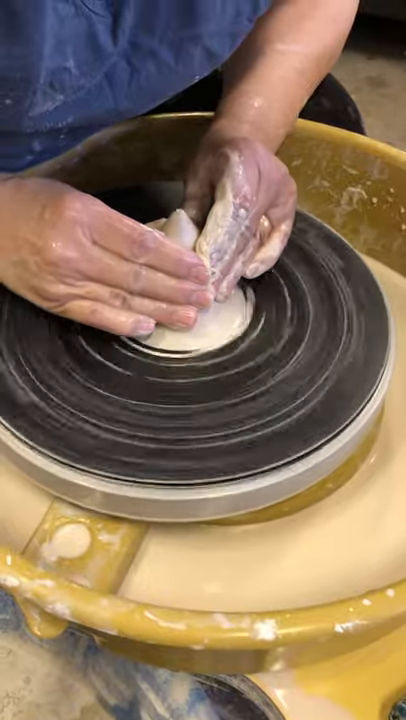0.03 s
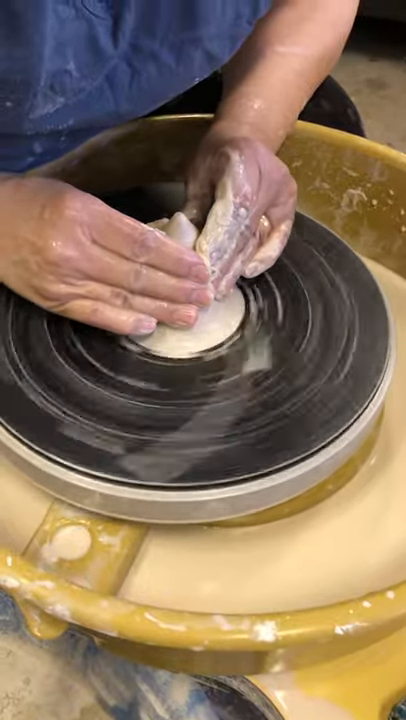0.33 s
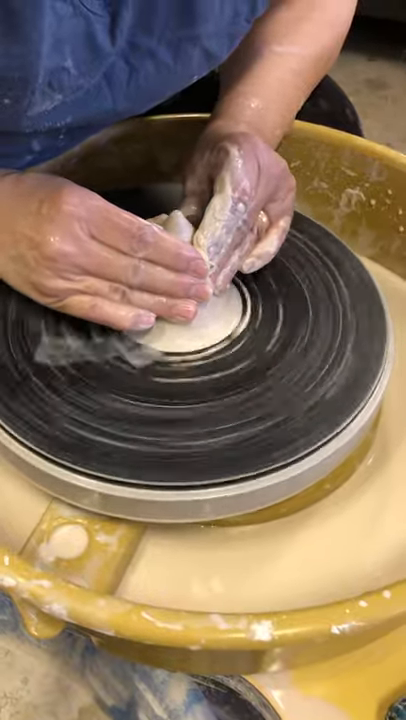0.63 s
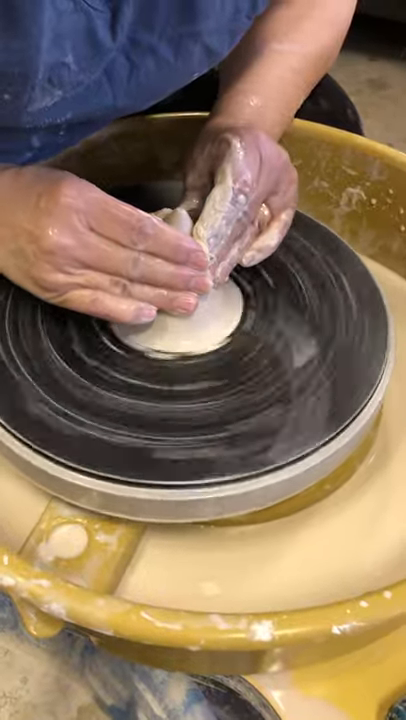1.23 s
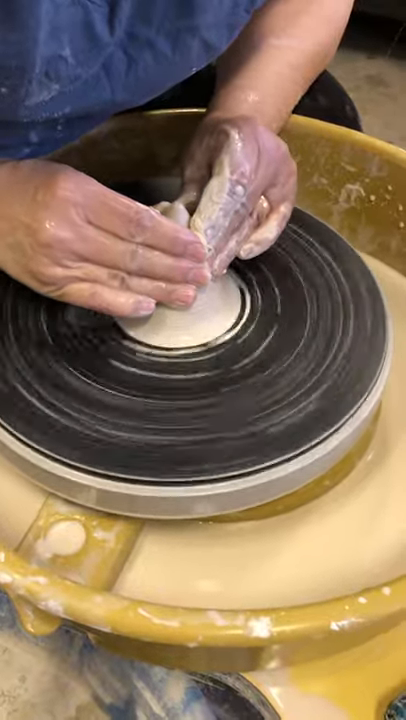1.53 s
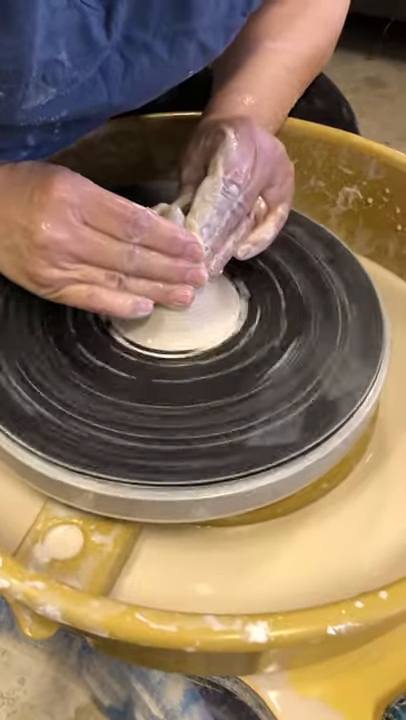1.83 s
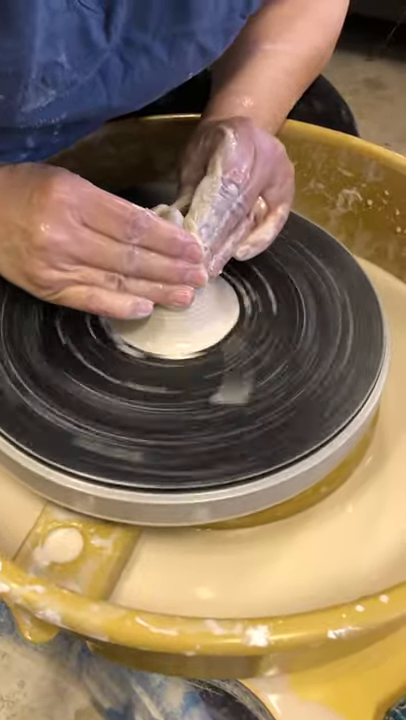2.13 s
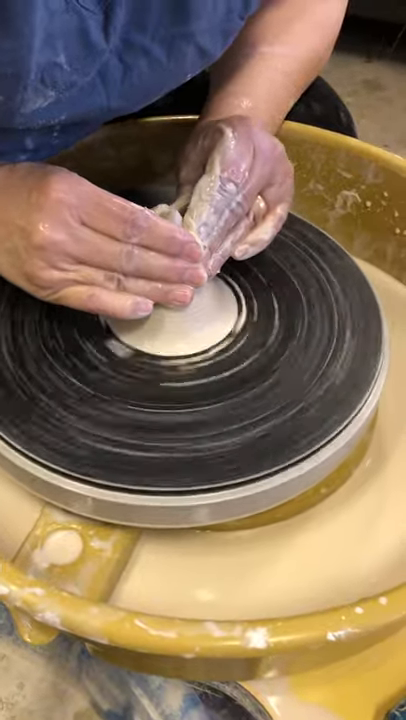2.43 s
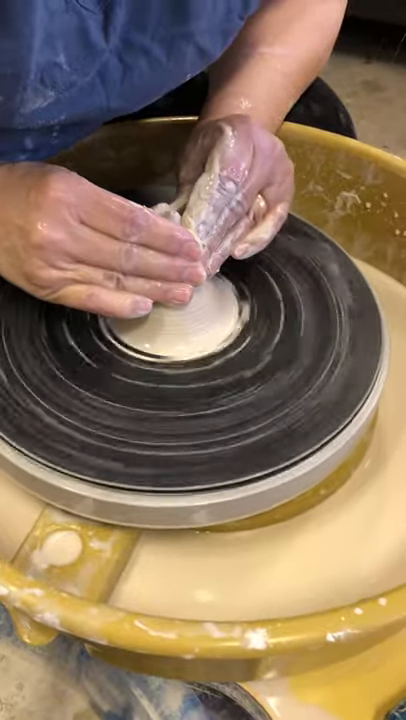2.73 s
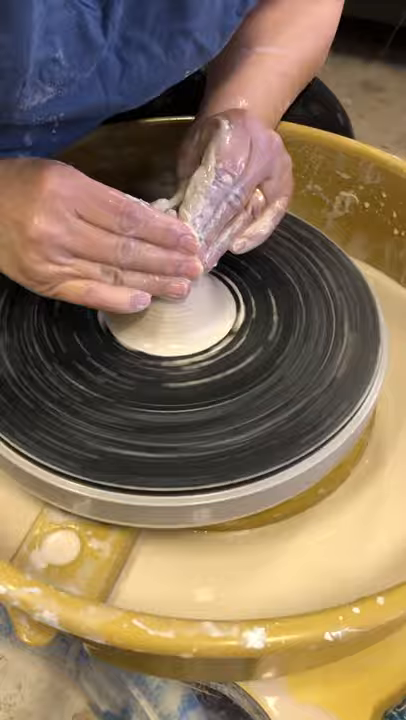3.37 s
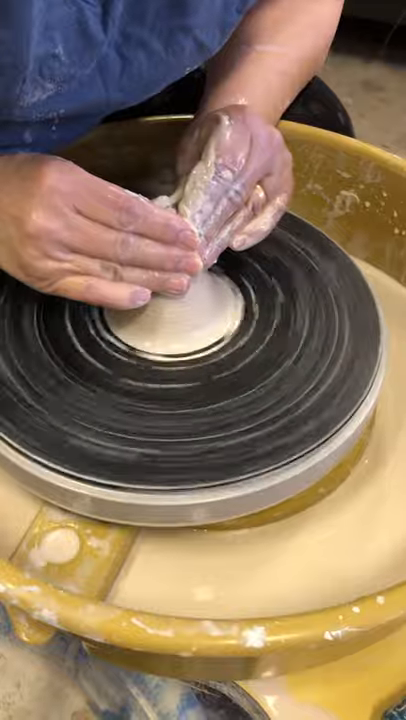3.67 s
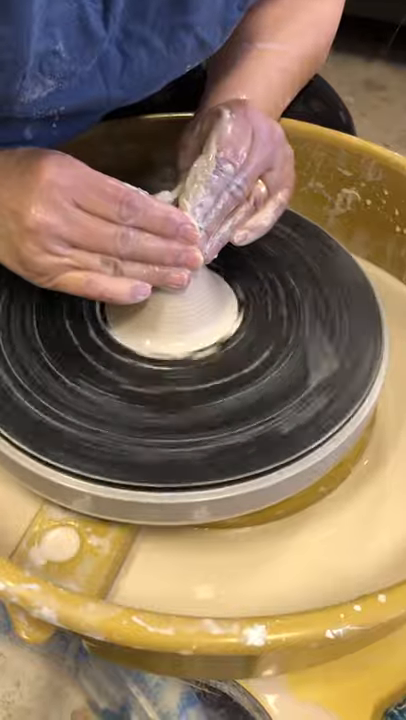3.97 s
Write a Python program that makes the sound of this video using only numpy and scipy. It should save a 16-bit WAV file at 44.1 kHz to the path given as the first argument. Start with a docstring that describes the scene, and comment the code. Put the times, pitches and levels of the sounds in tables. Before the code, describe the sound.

Close up in a quiet room, a pottery wheel spins with a steady low motor hum, a slight whine and a rhythmic throb. Throughout, wet clay softly squelches and ticks under the hands.

```python
"""A close, throbbing hum: an electric pottery wheel turns steadily while wet hands centre a lump of clay.
The motor hums and whines; uneven spots in the drive make the frame throb in the same pattern every turn.
The bearings rumble and whirr over faint room hiss. Bubbles in the slip squelch and pop under the palms,
the wheel head thuds as the hands lean in, and clay drags softly on the skin."""
import sys
import numpy as np
from scipy import signal
from scipy.fft import rfft, irfft
from scipy.io import wavfile

SR = 44100
rng = np.random.default_rng(int(sys.argv[2]) if len(sys.argv) > 2 else 0)


def unload_wav(signal):
    """Save mono or channel-first audio to the path in sys.argv[1] as 16-bit WAV at rate SR, clipped to [-1, 1]."""
    wavfile.write(
        sys.argv[1],
        SR,
        np.round(np.clip(np.atleast_2d(signal).T, -1, 1) * 32767).astype(np.int16),
    )


N = 176400
TIME_S = np.arange(N) / SR
FREQ_HZ = np.fft.rfftfreq(N, 1 / SR)
TURN_S = .5215

# motor hum: mains_multiple, level_db
HUM_HARMONICS = [(2, -50.5), (4, -43), (6, -70.5), (8, -57), (10, -44), (12, -50), (16, -68), (26, -74),
                 (34, -74), (38, -84), (40, -77.5)]
# rotor whine: rotor_multiple, level_db
WHINE_HARMONICS = [(1, -58.5), (2, -50.5), (4, -69)]
# frame throbs within one turn: centre_s, half_length_s, peak_db, pitch_hz
FRAME_THROBS = [(.0247, .015, -32.3, 172), (.0668, .014, -33.5, 168), (.0848, .017, -29.3, 164),
                (.143, .011, -39, 165), (.2405, .009, -33, 170), (.2985, .014, -33, 184),
                (.3265, .011, -34.5, 152), (.3665, .012, -34, 165), (.3855, .007, -37.5, 190),
                (.407, .009, -38, 175), (.4695, .02, -28.1, 169), (.4985, .011, -38, 170)]
# drive rumble: freq_hz, relative_density_db
RUMBLE_SPECTRUM = [(25, -46), (35, -35), (48, -14), (60, -18.5), (72, -8), (92, -14), (110, -3),
                   (126, -5.5), (140, 1), (190, 1), (220, 3), (255, -5.5), (290, -0.5), (315, -6),
                   (360, -5), (400, -7), (455, -10), (510, -7.5), (580, -5.5), (680, -11), (755, -11.5),
                   (820, -16.5), (1300, -50.5)]
# rumble that repeats each turn: freq_hz, power_share
RUMBLE_REPEATS = [(60, 1), (170, 0), (300, 0.24), (700, 0.08)]
# rough stretches of the drive within one turn: centre_s, half_length_s, gain_db
RUMBLE_SURGES = [(0.082, 0.015, 4), (.24, .012, 3), (.345, .025, 1.5), (0.428, 0.023, 5.5)]
# bearing housing resonances: centre_hz, width_hz, level_db
HOUSING_MODES = [(894, 67, -68.5), (1076, 150, -62), (1569, 104, -66), (1826, 240, -62.5),
                 (1890, 54, -65.5), (2233, 220, -70), (2643, 220, -69), (3250, 1050, -72.5),
                 (3705, 160, -75.5)]
# room hiss: freq_hz, relative_density_db
HISS_SPECTRUM = [(20, -21), (800, -3), (1300, 20), (2300, 2.5), (3000, 1.5), (4300, 2), (5600, -6.5),
                 (7000, -1), (8300, -8), (9700, -3), (11000, -41), (13000, -29), (16000, -18)]
# slip squeezed out under the palms: centre_s, half_length_s, level_db, centre_pitch_hz
SLIP_SQUELCHES = [(0.02, 0.039, -68.5, 9000), (0.342, .025, -69, 9000), (0.577, .006, -54.5, 12000),
                  (0.68, 0.017, -60, 9500), (0.807, .03, -74, 9900), (0.995, .025, -63.5, 7360),
                  (1.048, 0.01, -64, 9000), (1.134, 0.03, -67, 6400), (1.443, 0.027, -63.5, 5450),
                  (1.64, 0.061, -70.5, 10000), (1.713, 0.014, -65.5, 9800), (1.94, 0.019, -70, 7500),
                  (2.03, .03, -76, 9000), (2.15, .04, -73, 9800), (2.368, 0.0079, -73, 12900),
                  (2.62, 0.039, -72, 8000), (2.844, 0.017, -90, 14800), (3.107, 0.018, -78, 11200),
                  (3.657, 0.03, -78, 14100)]
# bubbles bursting in the slip: start_s, peak_db, pitch_hz, decay_s
SLIP_POPS = [(.2443, -55, 6800, 0.00057), (0.305, -55.5, 5440, 0.001), (.349, -50.5, 8600, 0.00075),
             (.555, -46.5, 4450, 0.001), (.559, -53, 8600, .0015), (0.5732, -50, 4450, 0.00062),
             (0.574, -47, 10330, 0.00073), (.5755, -42.5, 12900, 0.0013), (.667, -50, 5440, 0.002),
             (.670, -44, 7200, 0.001), (.6792, -57, 11000, .0018), (.6988, -52, 14800, .001),
             (0.769, -49, 2200, 0.0012), (0.8168, -53, 12200, .0007), (.8948, -53, 10400, 0.00026),
             (.9602, -34.5, 5200, .0013), (0.963, -45, 7200, 0.0011), (0.9712, -45, 5670, 0.0039),
             (.9745, -50, 12600, 0.001), (.9836, -54, 11700, 0.00088), (1.008, -46.5, 4040, 0.0016),
             (1.043, -55, 6260, 0.0012), (1.1283, -58, 8200, 0.0014), (1.2584, -52, 12700, 0.0011),
             (1.4222, -56, 4370, 0.0016), (1.4303, -51, 5760, .0012), (1.4411, -48, 4100, 0.00074),
             (1.47, -53, 4100, .0012), (1.7026, -68, 7200, 0.0019), (1.715, -52.5, 10100, 0.0008),
             (1.7698, -38, 13400, 0.00059), (1.792, -44.5, 11000, 0.00065), (1.8198, -52.5, 10700, 0.0012),
             (1.901, -56, 5600, 0.0025), (1.935, -47.5, 15000, 0.0023), (2.1076, -54.5, 10500, .0008),
             (2.128, -48, 14300, .001), (2.1762, -52.5, 7500, 0.00098), (2.245, -52, 9300, .0009),
             (2.5955, -53.5, 7700, 0.0017), (2.6435, -53, 9100, 0.00063), (3.0212, -54, 14600, 0.00067),
             (3.0767, -31, 8970, 0.00059), (3.0775, -40, 12700, .001), (3.1008, -51, 12200, .001),
             (3.127, -52, 11200, .0008), (3.232, -43.5, 12000, 0.00093), (3.822, -63, 9800, 0.0007)]
# wheel head thuds: centre_s, half_length_s, peak_db, pitch_hz
HEAD_THUDS = [(.763, 0.0066, -35, 228), (2.838, 0.044, -37, 232.4), (2.9, 0.016, -33.5, 203)]
# clay dragging on skin: centre_s, half_length_s, level_db
CLAY_DRAGS = [(.963, 0.033, -56), (0.996, 0.012, -56), (2.013, 0.018, -54), (2.55, 0.035, -69),
              (3.045, 0.018, -55)]


def amp(db):
    """Decibels to gain."""
    return 10 ** (np.asarray(db) / 20)


def unit_rms(x):
    """Scale to rms 1."""
    return x / np.sqrt(np.mean(x ** 2) + 1e-20)


def curve(points):
    """Interpolate a table over log frequency."""
    hz, value = np.transpose(points)
    return np.interp(np.log(FREQ_HZ + 1), np.log(hz), value)


def filtered(x, gain):
    """Apply one gain per frequency bin."""
    return irfft(rfft(x) * gain, N)


def noise():
    """White noise."""
    return rng.standard_normal(N)


def each_turn(x):
    """Loop the first turn of a signal."""
    return np.resize(x[:round(TURN_S * SR)], N)


def waver(rate_hz):
    """Slow random motion, rms 1."""
    return unit_rms(filtered(noise(), np.exp(-(FREQ_HZ / rate_hz) ** 2) * (FREQ_HZ > 0)))


def resonance(centre_hz, width_hz):
    """Noise in one steep band, rms 1."""
    return unit_rms(filtered(noise(), 1 / (1 + (2 * (FREQ_HZ - centre_hz) / width_hz) ** 2)))


def swell(centre_s, half_s):
    """Gaussian envelope, peak 1."""
    return np.exp(-np.minimum(((TIME_S - centre_s) / half_s) ** 2, 50))


def harmonics(table, cycles, waver_db, waver_hz):
    """Random-phase partials, each wavering about its rms level."""
    out = np.zeros(N)
    for multiple, db in table:
        peak = np.sqrt(2) * amp(db + waver_db * waver(waver_hz))
        out += peak * np.sin(2 * np.pi * (multiple * cycles + rng.random()))
    return out


def motor(mains_hz=59.99, rotor_hz=328.7, drift_share=.0013):
    """Steady mains hum and a rotor whine that drifts with the load."""
    hum = harmonics(HUM_HARMONICS, mains_hz * TIME_S, waver_db=.2, waver_hz=7.1)
    rotor_cycles = np.cumsum(rotor_hz * (1 + drift_share * waver(rate_hz=4.8))) / SR
    whine = harmonics(WHINE_HARMONICS, rotor_cycles, waver_db=.6, waver_hz=14)
    return hum + whine


def frame_throbs(spread_db=1):
    """Each uneven spot in the drive swells the frame's low resonance once a turn."""
    out = np.zeros(N)
    for centre_s, half_s, db, hz in FRAME_THROBS:
        turn = np.round((TIME_S - centre_s) / TURN_S).astype(int)
        offset_s = TIME_S - centre_s - turn * TURN_S
        turn_peaks = amp(db + spread_db * rng.standard_normal(12))
        out += turn_peaks[turn] * np.exp(-(offset_s / half_s) ** 2) * np.cos(2 * np.pi * hz * offset_s)
    return out


def bearing_rumble(base_db=-43.5, surge_above_hz=148):
    """Rolling roughness, partly the same each turn, surging at the rough stretches."""
    share = np.clip(curve(RUMBLE_REPEATS), 0, 1)
    repeating = filtered(each_turn(noise()), np.sqrt(share))
    fresh = filtered(noise(), np.sqrt(1 - share))
    rumble = amp(base_db) * unit_rms(filtered(repeating + fresh, amp(curve(RUMBLE_SPECTRUM))))
    bass = filtered(rumble, 1 / (1 + (FREQ_HZ / surge_above_hz) ** 8))
    surge_db = each_turn(sum(db * swell(centre_s, half_s) for centre_s, half_s, db in RUMBLE_SURGES))
    return bass + amp(surge_db) * (rumble - bass)


def bearing_whirr(flutter_db=2.5):
    """The bearings ring their housing, with the same flutter each turn."""
    flutter = unit_rms(amp(flutter_db * each_turn(waver(rate_hz=34))))
    return flutter * sum(amp(db) * resonance(hz, width_hz) for hz, width_hz, db in HOUSING_MODES)


def room_hiss(level_db=-67):
    """Steady background noise."""
    return amp(level_db) * unit_rms(filtered(noise(), amp(curve(HISS_SPECTRUM))))


def crackle(rate_per_s, pitch_hz, spread_db=4, decay_cycles=.96):
    """Tiny bubbles of one pitch and uneven strength, each a few cycles long; rms 1."""
    strengths = amp(spread_db * np.minimum(rng.exponential(1, N), 3.5))
    onsets = rng.random(N) < rate_per_s / SR
    cycles = pitch_hz * TIME_S[:SR // 200]
    bubble = np.sin(2 * np.pi * cycles) * cycles * np.exp(-cycles / decay_cycles)
    return unit_rms(signal.oaconvolve(strengths * onsets, bubble)[:N])


def slip_squelches(bands=14, spread_oct=1, bubbles_per_s=3700, strays_per_s=87, stray_db=-83.5):
    """Squeezed slip sheds bubble clouds, each around its own pitch, with stray ticks between."""
    pitches_hz = np.geomspace(3900, 14500, bands)
    envelopes = np.zeros((bands, N))
    for centre_s, half_s, db, centre_hz in SLIP_SQUELCHES:
        offsets_oct = np.log2(pitches_hz / centre_hz)
        weights = unit_rms(np.exp(-(offsets_oct / spread_oct) ** 2 / 2))
        envelopes += np.outer(weights, amp(db) * swell(centre_s, half_s))
    out = np.zeros(N)
    for hz, envelope in zip(pitches_hz, envelopes):
        out += envelope * crackle(bubbles_per_s / bands, hz)
        out += amp(stray_db) * crackle(strays_per_s / bands, hz)
    return out / np.sqrt(bands)


def slip_pops(glide_per_s=22, jitter_share=.075, jitter_hz=2500, rise_share=.95, spray_gain=.28):
    """Single bubbles burst: a ring of unsteady, rising pitch and a fine spray."""
    out = np.zeros(N)
    age_s = TIME_S[:SR // 50]
    for start_s, db, hz, decay_s in SLIP_POPS:
        jitter_noise, spray_noise = rng.standard_normal((2, len(age_s)))
        jitter = unit_rms(signal.lfilter(*signal.butter(2, jitter_hz, fs=SR), jitter_noise))
        pitch_hz = hz * (1 + glide_per_s * age_s + jitter_share * jitter)
        ring = np.sin(2 * np.pi * np.cumsum(pitch_hz) / SR)
        spray = unit_rms(signal.lfilter(*signal.butter(2, hz / 2, "high", fs=SR), spray_noise))
        attack = 1 - np.exp(-(age_s / (rise_share * decay_s)) ** 2)
        envelope = attack * np.exp(-age_s / decay_s)
        pop = amp(db) * envelope / envelope.max() * (ring + spray_gain * spray)
        start = round(start_s * SR)
        out[start:start + len(pop)] += pop[:N - start]
    return out


def head_thuds():
    """The wheel head thuds as the hands lean on the clay."""
    return sum(amp(db) * swell(centre_s, half_s) * np.cos(2 * np.pi * hz * (TIME_S - centre_s))
               for centre_s, half_s, db, hz in HEAD_THUDS)


def clay_drags():
    """Clay rubs on skin: brief swells of narrow-band noise."""
    envelope = sum(amp(db) * swell(centre_s, half_s) for centre_s, half_s, db in CLAY_DRAGS)
    return envelope * resonance(centre_hz=1000, width_hz=51)


def reflections(x, level_db=-11, t60_s=.081):
    """Add short reflections from the splash pan and the studio."""
    tail = (noise() * amp(-60 * TIME_S / t60_s))[:SR // 2]
    return x + amp(level_db) * signal.fftconvolve(x, tail / np.linalg.norm(tail))[:N]


def scene():
    """Wheel, room hiss and hands on wet clay; mono."""
    wheel = motor() + frame_throbs() + bearing_rumble() + bearing_whirr()
    hiss = room_hiss()
    hands = slip_squelches() + slip_pops() + clay_drags()
    return (wheel + hiss + reflections(hands) + head_thuds())[None]


def record(dry):
    """Steep low-pass."""
    cutoff_hz = 16000
    taps = signal.firwin(511, cutoff_hz, window=("kaiser", 9), fs=SR)
    return signal.oaconvolve(dry, taps[None], "same")


dry = scene()
out = record(dry)
unload_wav(out)
```